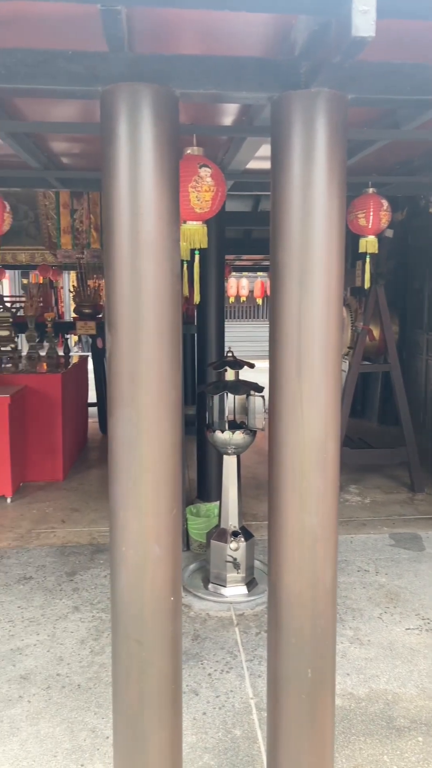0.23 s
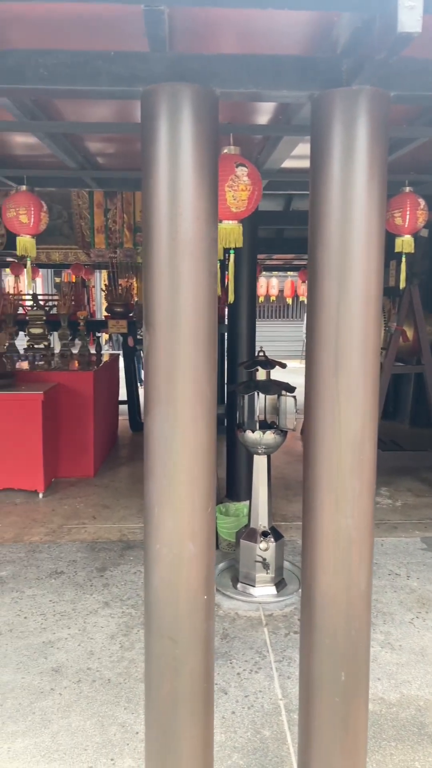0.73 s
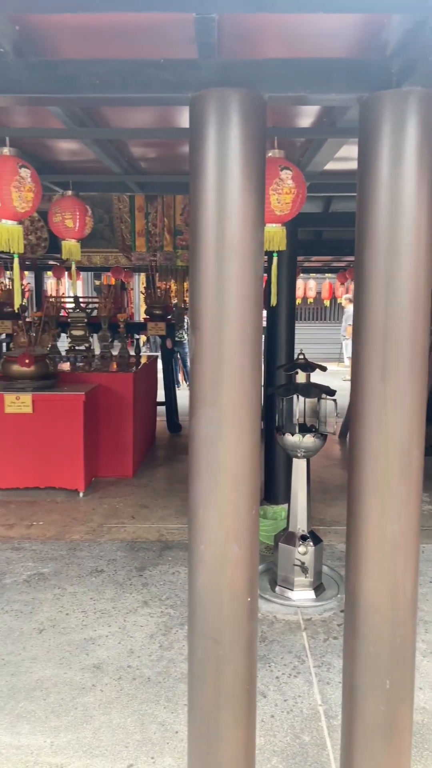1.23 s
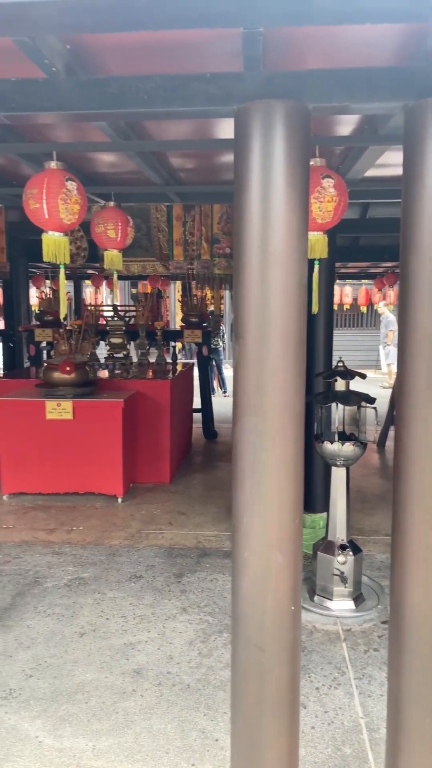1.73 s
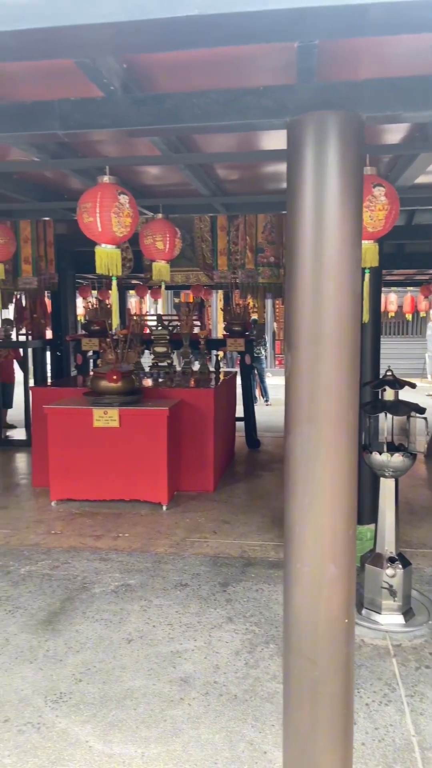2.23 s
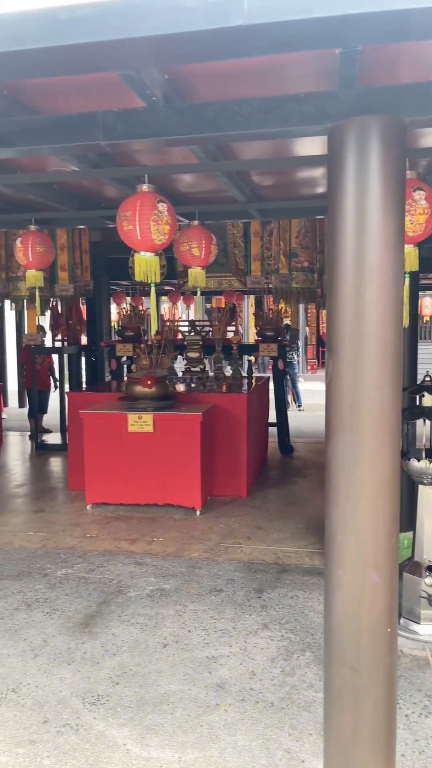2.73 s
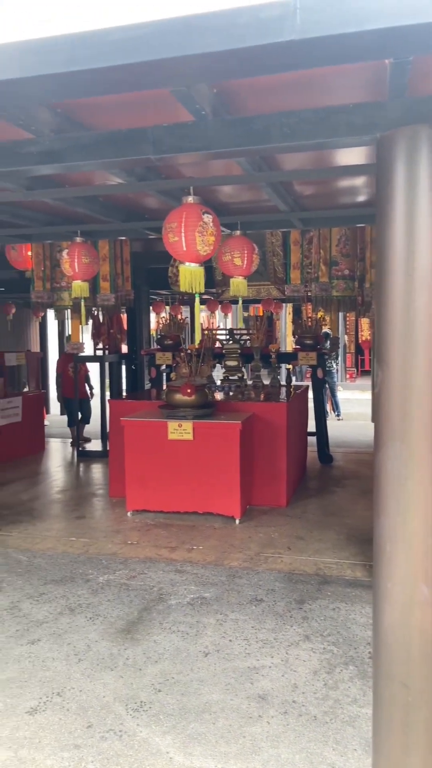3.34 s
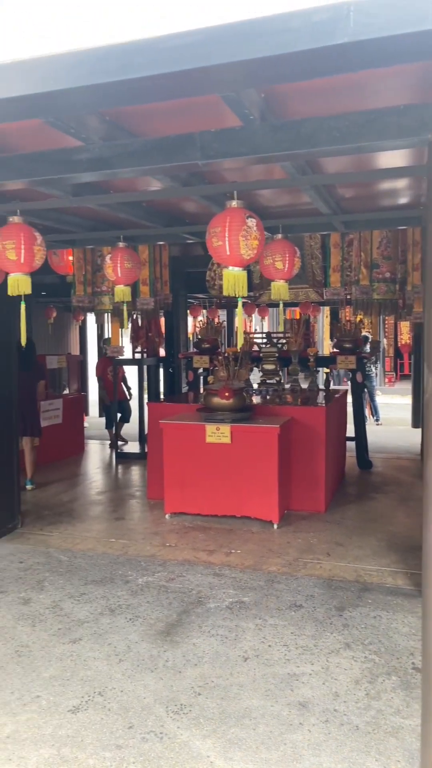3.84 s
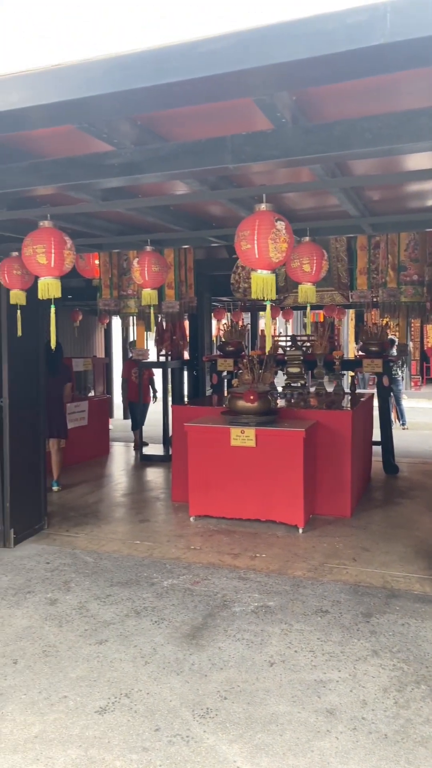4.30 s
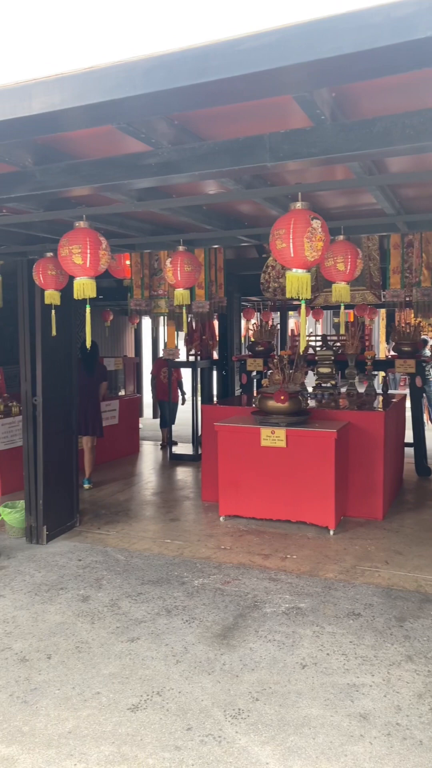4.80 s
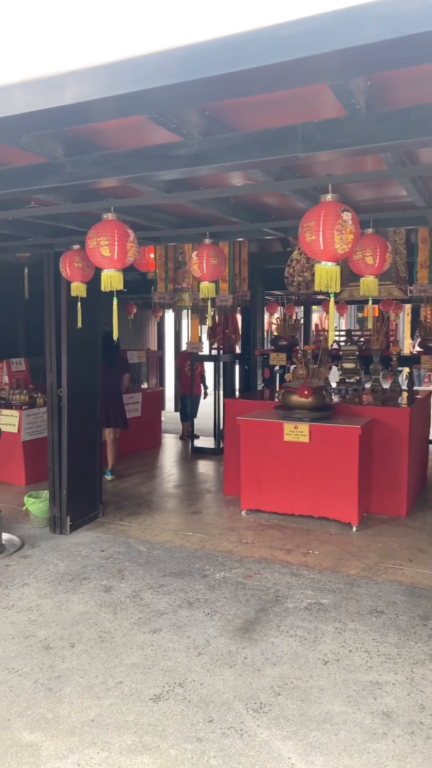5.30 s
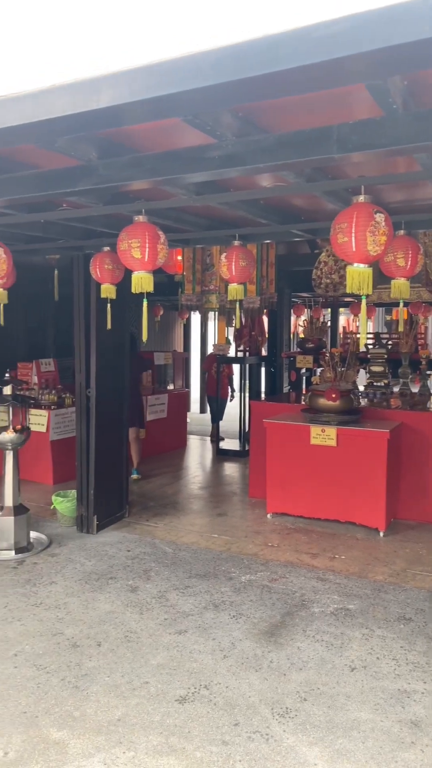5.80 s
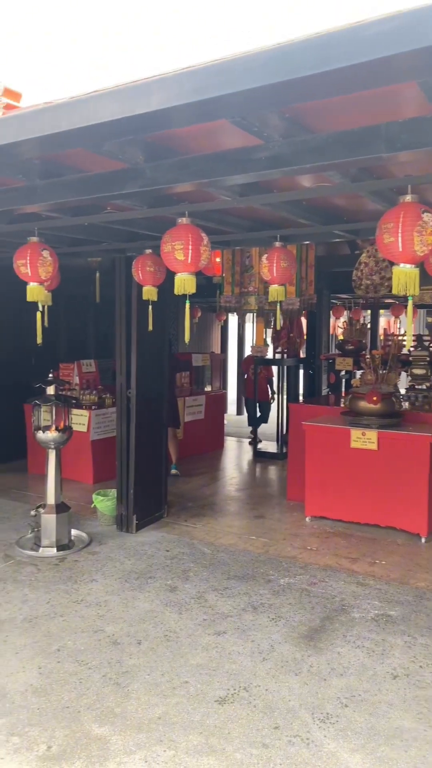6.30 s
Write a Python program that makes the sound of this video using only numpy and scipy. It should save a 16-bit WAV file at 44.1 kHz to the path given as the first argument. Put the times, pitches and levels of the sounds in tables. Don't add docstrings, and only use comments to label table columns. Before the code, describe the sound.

A phone moves through a covered outdoor courtyard, and almost everything heard is at its own microphone. A deep unsteady rumble runs throughout, with bassy buffets landing irregularly. Fingers flick and scuff the case. One hard knock comes after a second, another around two, then a cluster between five and six. Faint hiss swells and drops behind the blows, with a few dry ticks.

```python
import sys
import numpy as np
from scipy import signal
from scipy.fft import rfft, irfft
from scipy.io import wavfile
from scipy.ndimage import uniform_filter1d

SR = 44100
rng = np.random.default_rng(int(sys.argv[2]) if len(sys.argv) > 2 else 0)


def volts(x):
    e = np.asarray(x, float) / 20
    return 10 ** e


def waveform_to_disk(signal):
    frames = np.transpose(np.atleast_2d(signal))
    scaled = np.clip(frames, -1, 1) * 32767
    samples = np.round(scaled).astype(np.int16)
    wavfile.write(sys.argv[1], SR, samples)


N = 288855
T = np.arange(N) / SR
HZ = np.maximum(np.fft.rfftfreq(N, 1 / SR), 1)

# time in seconds, level in dB.
RUMBLE_LEVEL = [(0.0, -23.5), (0.24, -25.5), (0.66, -26.5), (0.78, -28), (1.37, -24.5), (1.77, -26.5),
                (2.48, -24), (2.9, -26), (3.87, -25), (4.1, -27), (4.25, -27.5), (4.47, -25.5), (4.8, -26),
                (5.45, -20), (6.26, -25), (6.55, -28)]
# frequency in Hz, density in dB per Hz.
RUMBLE_SPECTRUM = [(15, -20), (30, -0.5), (60, 9.5), (90, 3.5), (150, -8), (250, -26), (400, -42.5),
                   (700, -56.5), (1500, -71), (5000, -130)]
# frequency in Hz, density in dB per Hz.
QUIET_SPECTRUM = [(200, 6), (430, 10), (800, -3.5), (2000, -8), (4000, -12.5), (8000, -16), (11000, -19.5),
                  (14000, -23), (16000, -27)]
# frequency in Hz, density in dB per Hz.
LOUD_SPECTRUM = [(200, 10), (600, 0.5), (1500, -1.5), (4000, -3), (8000, -6), (11000, -11), (14000, -15.5),
                 (16000, -20.5)]
# start in seconds, end in seconds.
LOUD_SPANS = [(0.324, 0.382), (0.437, 0.606), (0.721, 1.001), (1.028, 1.178), (1.326, 1.486), (1.572, 1.7),
              (1.748, 1.807), (1.993, 2.306), (2.623, 2.714), (2.969, 3.142), (3.191, 3.248),
              (3.401, 3.477), (3.836, 4.02), (4.137, 4.325), (4.387, 4.45), (4.492, 4.647), (4.68, 4.824),
              (4.898, 4.969), (5.118, 5.219), (5.34, 5.404), (5.439, 5.557), (5.573, 5.746), (5.861, 5.94),
              (5.998, 6.226), (6.245, 6.401), (6.454, 6.6)]
# time in seconds,
# peak in dB, width in ms.
GUSTS_IN = [(2.0418, -7.5, 0.44), (2.0451, -23, 0.16), (4.4937, -12.5, .52), (5.1181, -4.5, .3),
            (5.489, -10.5, 0.3), (5.9926, -5, 0.31), (6.0065, -23, 0.33), (6.2489, -21, 0.41),
            (.53, -5, 1.2), (.7959, -2, 2.5), (.8777, -5.6, 2.5), (1.1827, -1.5, 2.9), (2.5439, 1, 3.7),
            (2.8798, -6.5, 1.8), (3.1904, -0.2, 1.62), (3.8516, -5, 1.4), (3.9261, -9.5, 2.7),
            (4.4951, -1.3, 1.9), (4.5737, -3, 1.17), (4.5908, -0.3, .73), (5.6074, -4.5, 1.81),
            (5.8844, -3, 1.3), (5.9544, -2.7, 1.46), (6.2391, -2.2, 1.17), (6.4522, -5, 1.17)]
# time in seconds, peak in dB, width in ms.
GUSTS_OUT = [(.325, -2.5, 1.6), (.4556, -3.1, 1.2), (.5073, -9, 0.95), (1.1161, -4.5, 1.63),
             (1.3038, -3.5, 1.8), (1.6236, -5.5, 1.2), (1.7321, -1.5, 1.07), (2.0105, -4, .73),
             (2.222, -0.5, 1.06), (2.5776, -2, 1.81), (2.624, -2.5, 1.1), (2.9685, -6.5, 1.81),
             (2.9846, -3.5, 1.1), (3.478, -0.1, 1.44), (3.718, -3.5, 1.9), (4.5077, -6.5, .87),
             (4.5874, -16, 0.45), (4.7186, -9.5, 0.99), (4.7857, -2.5, 1.32), (4.9492, -4.5, 0.87),
             (5.0793, -6, 1), (5.2775, -6.5, 1.02), (5.3046, -3, 1.05), (5.4371, -0.5, 0.72),
             (5.4442, 2, 1.1), (5.456, 1, 1.25), (5.7079, -10.5, 0.96), (6.259, -6.5, 0.47),
             (6.431, -3, 0.94), (6.4755, -0.8, 1.5)]
# start in seconds, dull peak in dB, bright part in dB relative to it.
SCUFF_EVENTS = [(0.327, -52, -12), (0.528, -32, -27), (0.802, -50, -1), (1.056, -32, -6), (1.57, -37, -15),
                (1.724, -35.5, -18), (1.819, -55, -14), (2.039, -12, -35), (2.836, -38.5, -15),
                (2.964, -38, -13), (3.14, -49, -16), (3.347, -55, -33), (3.714, -45, -15.5),
                (3.953, -38, -20), (4.139, -39, -18), (4.372, -46, -25), (4.745, -42, -13),
                (4.898, -40, -20), (4.483, -45, -30), (4.927, -33.5, -29), (5.118, -12.5, -17.5),
                (5.341, -13, -25.5), (5.496, -17.5, -24), (5.575, -21, -15), (5.995, -13.5, -16),
                (6.257, -36, -21), (6.427, -46, -23)]
# time in seconds, peak in dB, width in ms, direction (+1 in, -1 out).
FLICK_EVENTS = [(0.4495, -13.5, 0.68, 1), (0.5037, -7.5, 0.63, 1), (.783, -17.5, 0.46, 1),
                (0.7962, -15.5, 0.59, -1), (1.299, -17, 0.58, 1), (1.7294, -14.8, 0.51, 1),
                (1.8215, -16, .62, 1), (1.9828, -12.5, 0.51, -1), (2.0064, -19.5, 0.29, -1),
                (2.2193, -33, 0.21, -1), (2.5625, -8, 0.92, -1), (2.6255, -11, 0.74, -1),
                (2.8392, -18, 0.4, -1), (3.4164, -23, .32, -1), (3.4769, -19, 0.39, -1),
                (3.7176, -17.5, .45, -1), (4.491, -18, .33, 1), (4.5008, -31, 0.2, 1),
                (4.5429, -13.5, 0.4, 1), (4.5615, -25.5, 0.2, 1), (4.5858, -29, 0.12, 1),
                (4.7173, -12, 0.7, -1), (4.9458, -14, .4, -1), (5.3098, -28.5, 0.22, -1),
                (5.4517, -12.5, .3, 1), (5.95, -13.5, .62, 1), (6.2401, -20.5, .33, 1),
                (6.294, -36, 0.093, 1), (6.427, -24, .25, -1), (6.5196, -23.8, 0.27, 1)]
# time in seconds, peak in dB, width in ms, sharp edge in dB relative
# to the peak, rebound in dB relative to the peak.
KNOCK_EVENTS = [
    (1.057, 4, 0.52, -24.5, -18),
    (2.0447, 5.5, 0.4, -18.5, -31),
    (5.1203, 5.5, 0.56, -24, -14.5),
    (5.345, 6, 0.52, -20, -20),
    (5.4948, 3.5, .35, -21, -17),
    (5.5766, 4, 0.47, -18, -16),
    (5.9955, 7, 0.41, -18.5, -10),
]
# time in seconds, signed size in full scale.
TICK_EVENTS = [
    (1.2188, 0.092),
    (1.22, -0.0057),
    (2.5424, -0.061),
    (3.866, -0.03),
    (5.1663, -0.035),
]


def level(x, db):
    return x * volts(db) / np.sqrt(np.mean(x ** 2))


def noise(spectrum, source=None):
    hz, db = np.transpose(spectrum)
    if source is None:
        source = rng.standard_normal(N)
    gain = volts(np.interp(np.log(HZ), np.log(hz), db))
    return irfft(rfft(source) * gain, N)


def walk(rate):
    hold = int(SR / rate)
    steps = np.repeat(rng.standard_normal(N // 200), hold)[:N]
    return 0.93 * uniform_filter1d(uniform_filter1d(steps, hold), hold)


def chain(x):
    low_hz, high_hz, turns_per_octave = 35, 3000, 0.954
    octaves = np.log2(np.clip(HZ, low_hz, high_hz) / high_hz)
    return irfft(rfft(x) * np.exp(-2j * np.pi * turns_per_octave * octaves), N)


def blows(table):
    out = np.zeros(N)
    near = np.arange(-2000, 2001)
    for s, db, width_ms in table:
        at = int(s * SR) + near
        u = np.abs(at / SR - s) * 1000 / width_ms
        out[at % N] += volts(db) * (1 + u + u ** 2 / 3) * np.exp(-u)
    return out


def rumble(top_flutter_db=4.5, eddies_per_s=90, eddy_share=0.5):
    eddies = (rng.random(N) < eddies_per_s / SR) * rng.laplace(size=N)
    flow = eddy_share * level(eddies, 0) + (1 - eddy_share) * rng.standard_normal(N)
    low = chain(noise(RUMBLE_SPECTRUM, flow))
    skirt = irfft(rfft(low) / (1 + (160 / HZ) ** 4), N)
    air = (low - skirt) * volts(2 * walk(25)) + skirt * volts(top_flutter_db * walk(35))
    return level(air, 0) * volts(np.interp(T, *np.transpose(RUMBLE_LEVEL)))


def hiss(quiet_db=-64, loud_db=-59):
    loud = sum((T > start) & (T < end) for start, end in LOUD_SPANS)
    loud = uniform_filter1d(1. * loud, size=200)
    return level(noise(QUIET_SPECTRUM), quiet_db) + loud * level(noise(LOUD_SPECTRUM), loud_db)


def gusts():
    return blows(GUSTS_IN) - blows(GUSTS_OUT)


def scuffs(rise_ms=0.67, dull_ms=6.6, bright_ms=1.9):
    dull = level(noise([(120, -23), (300, 9.5), (700, -9.5), (1200, -23.0), (2500, -64.5)]), -7)
    bright = level(noise([(500, -24.5), (1300, 0), (2500, -11), (4500, -28.5), (7000, -39.5)]), -0.8)
    out = np.zeros(N)
    for s, db, bright_db in SCUFF_EVENTS:
        start = int(s * SR)
        at = np.arange(start, min(start + 3000, N))
        ms = (at / SR - s) * 1000
        body = dull[at] * np.exp(-ms / dull_ms)
        edge = volts(bright_db) * bright[at] * np.exp(-ms / bright_ms)
        rise = 1 - np.exp(-(ms / rise_ms) ** 2)
        out[at] += volts(db) * rise * (body + edge)
    return out


def flicks():
    inward = [row[:3] for row in FLICK_EVENTS if row[3] > 0]
    outward = [row[:3] for row in FLICK_EVENTS if row[3] < 0]
    return blows(inward) - blows(outward)


def knocks(recoil_db=-13, rattle_db=-27.5, rattle_ms=30, rattle_fall_db_per_ms=0.5):
    inward, outward = [], []
    for s, db, width_ms, edge_db, rebound_db in KNOCK_EVENTS:
        inward.append((s, db, width_ms))
        inward.append((s - 0.3 / 1000, db + edge_db, 0.11))
        outward.append((s + 1.23 / 1000, db + rebound_db, 0.36))
        outward.append((s + 5.5 / 1000, db + recoil_db, 0.93))
        for late_ms in 4 + rattle_ms * rng.random(4) ** 2:
            rattle = db + rattle_db - rattle_fall_db_per_ms * late_ms
            outward.append((s + late_ms / 1000, rattle, 0.17))
    return blows(inward) - blows(outward)


def ticks():
    out = np.zeros(N)
    for s, size in TICK_EVENTS:
        out += size * np.sinc((T - s) * 22000) * np.exp(-((T - s) / 0.00008) ** 2)
    return out


def scene():
    pressure = gusts() + flicks() + knocks()
    pressure = irfft(rfft(pressure) / (1 + (40 / HZ) ** 3), N)
    return (chain(pressure) + rumble() + scuffs() + hiss())[None]


def band_limit(x):
    return signal.sosfilt(signal.butter(12, 15760, fs=SR, output="sos"), x)


def record(dry):
    top = 0.7
    x = dry / (1 + np.abs(dry / top) ** 6) ** (1 / 6)
    quarter_rate = np.cos(2 * np.pi * np.arange(N) / 4)
    x = x + volts(-60) * x * np.abs(x) ** 0.5 * quarter_rate
    low_pass = signal.butter(16, 15700, fs=SR, output="sos")
    x = signal.sosfiltfilt(low_pass, x + ticks())
    return band_limit(x)


dry = scene()
out = record(dry)
waveform_to_disk(out)
```